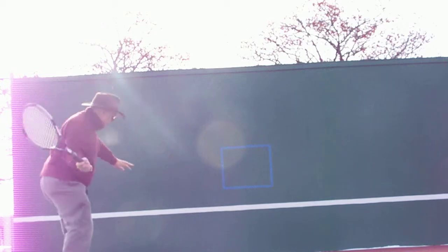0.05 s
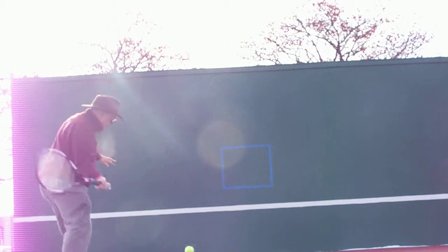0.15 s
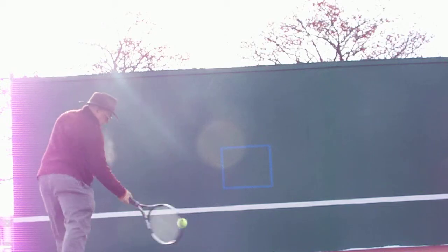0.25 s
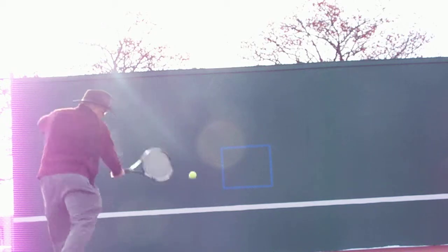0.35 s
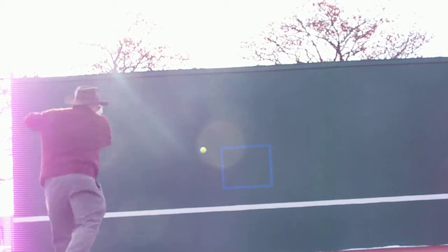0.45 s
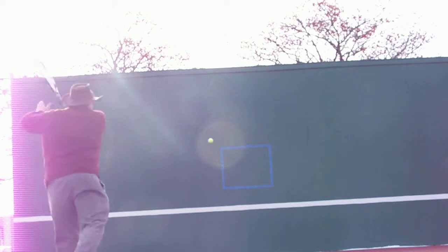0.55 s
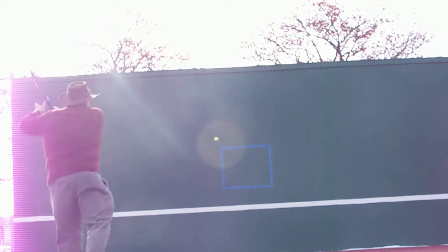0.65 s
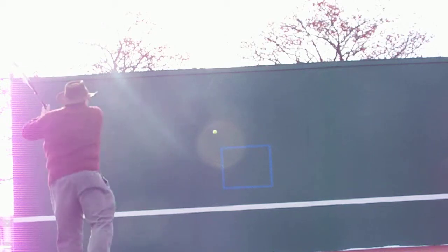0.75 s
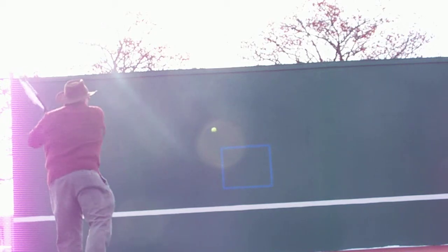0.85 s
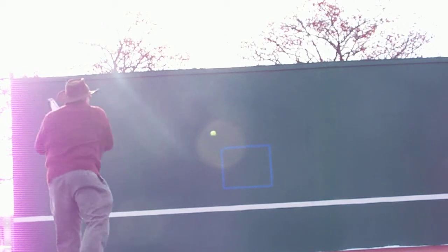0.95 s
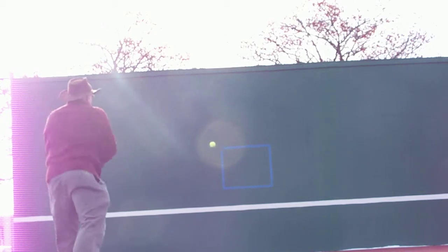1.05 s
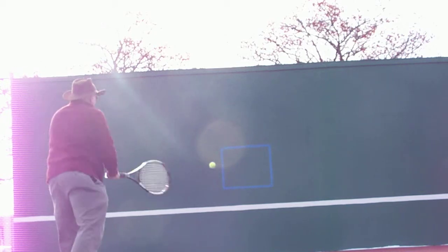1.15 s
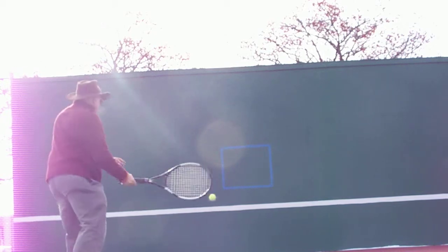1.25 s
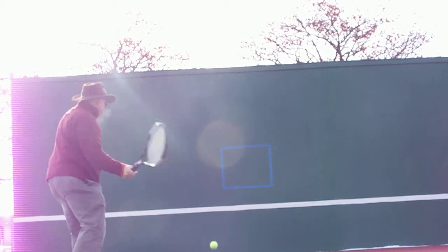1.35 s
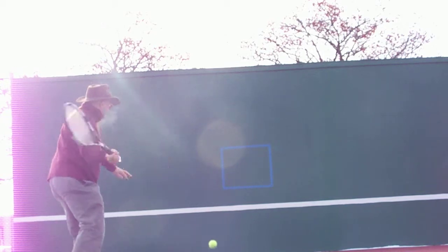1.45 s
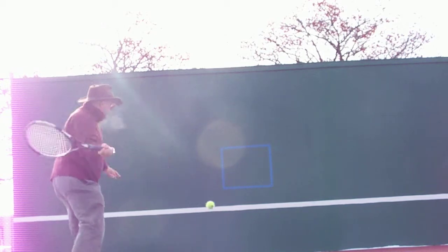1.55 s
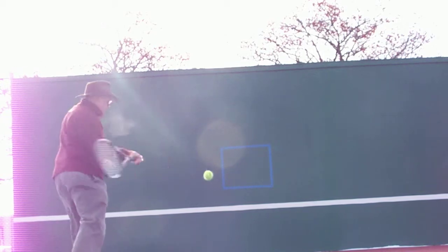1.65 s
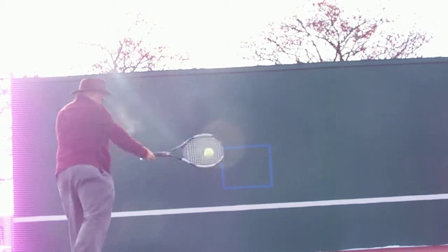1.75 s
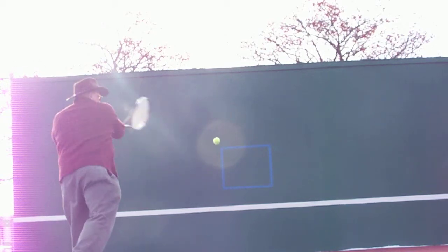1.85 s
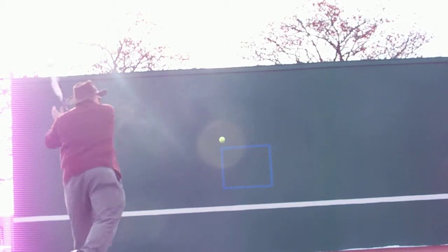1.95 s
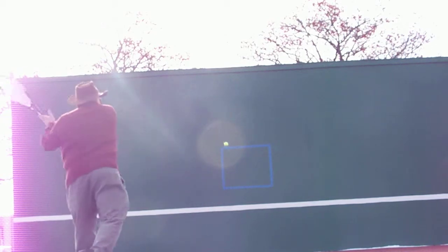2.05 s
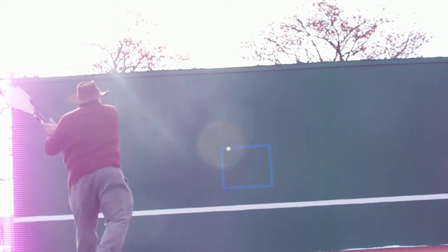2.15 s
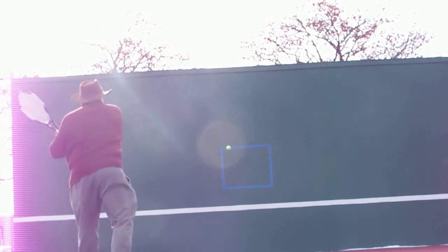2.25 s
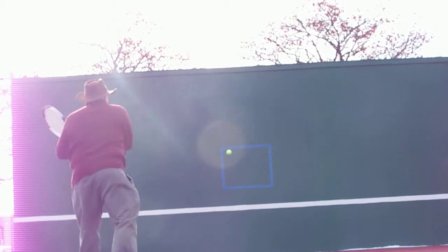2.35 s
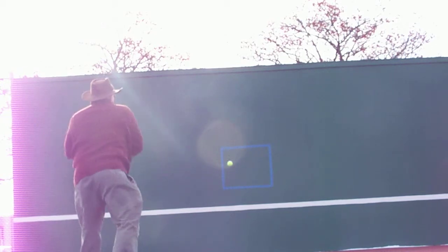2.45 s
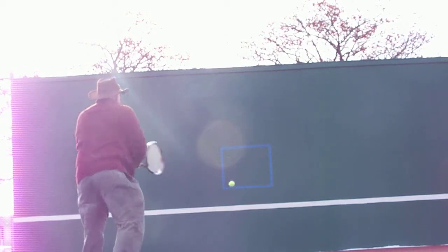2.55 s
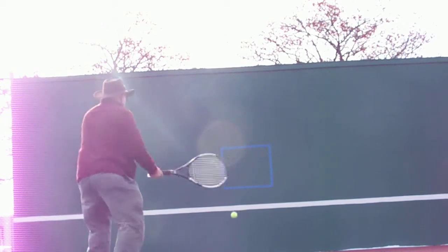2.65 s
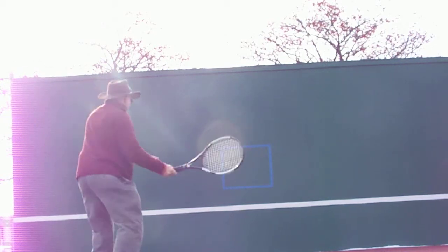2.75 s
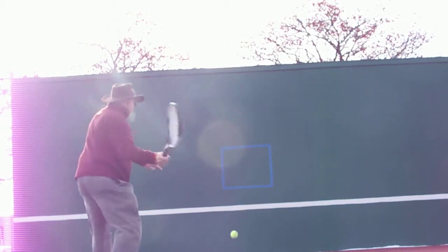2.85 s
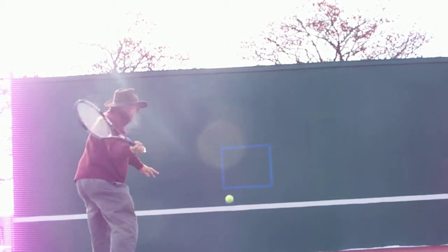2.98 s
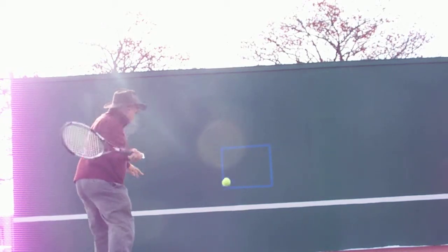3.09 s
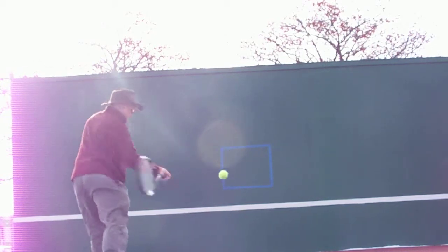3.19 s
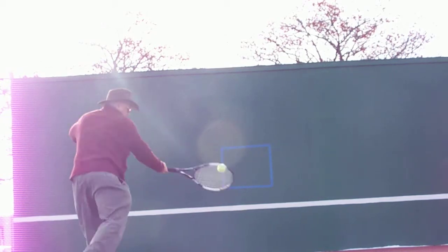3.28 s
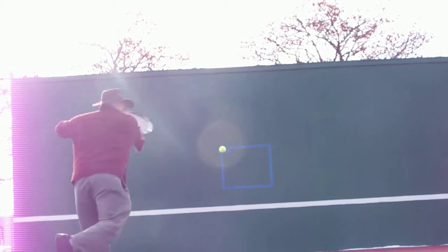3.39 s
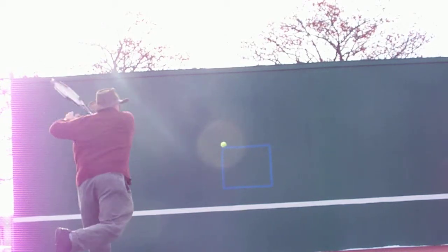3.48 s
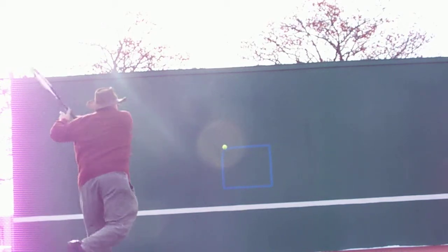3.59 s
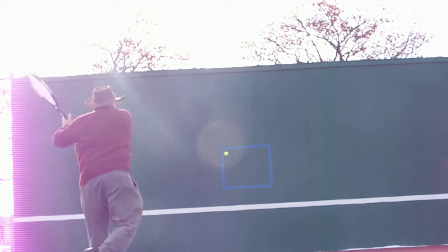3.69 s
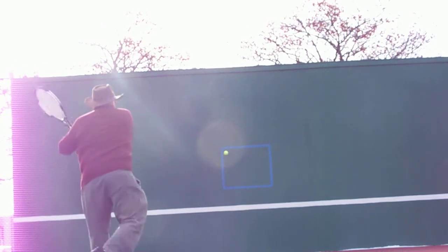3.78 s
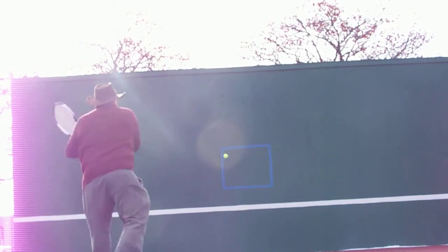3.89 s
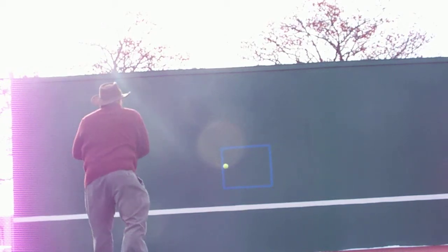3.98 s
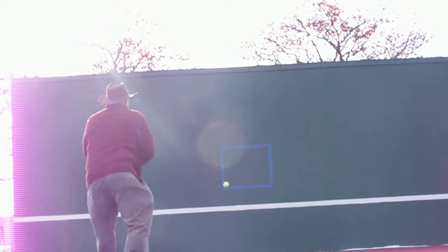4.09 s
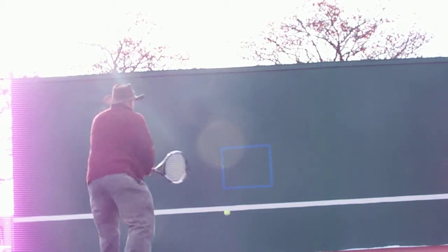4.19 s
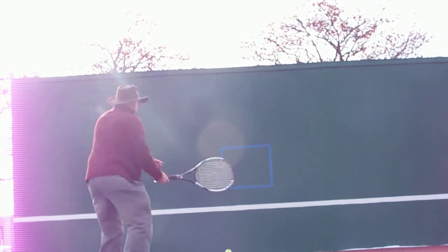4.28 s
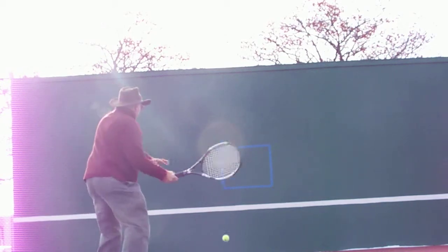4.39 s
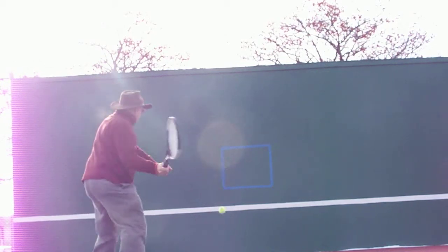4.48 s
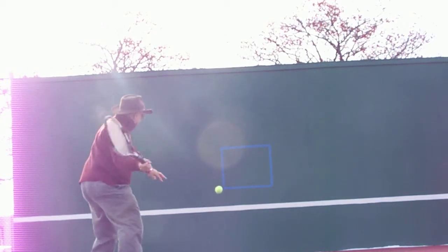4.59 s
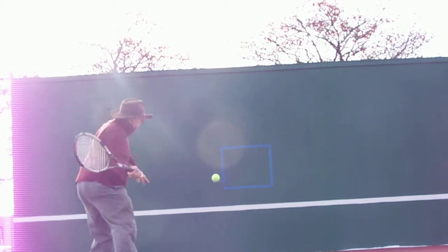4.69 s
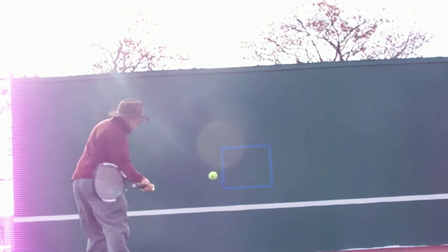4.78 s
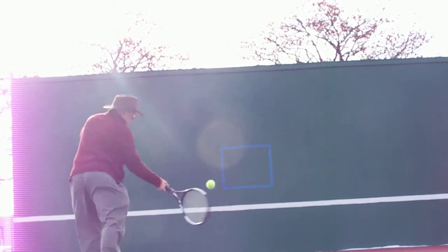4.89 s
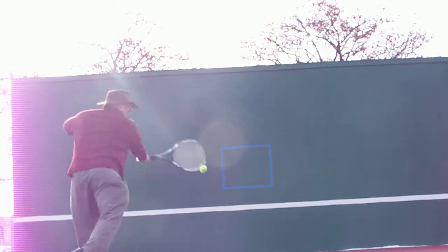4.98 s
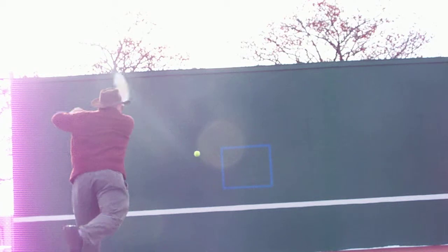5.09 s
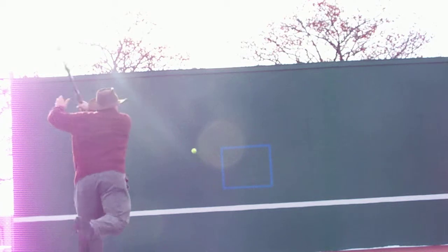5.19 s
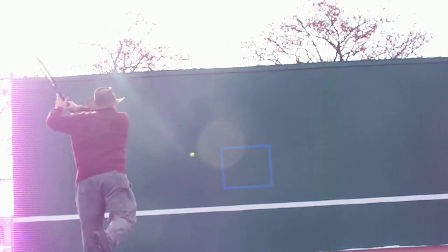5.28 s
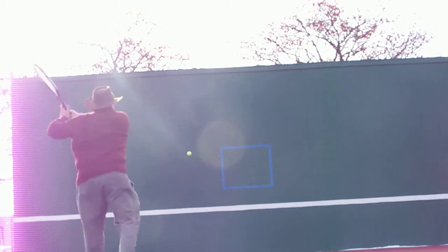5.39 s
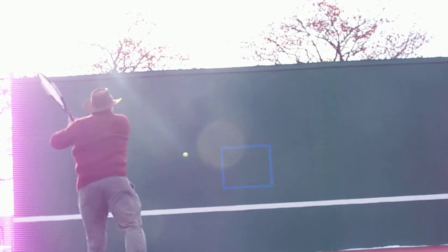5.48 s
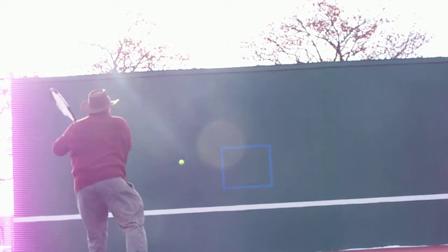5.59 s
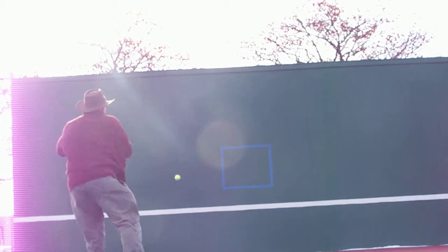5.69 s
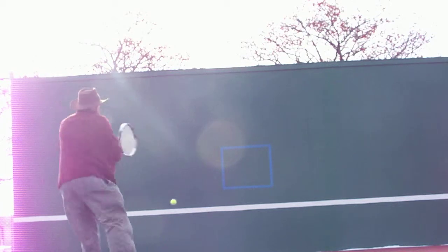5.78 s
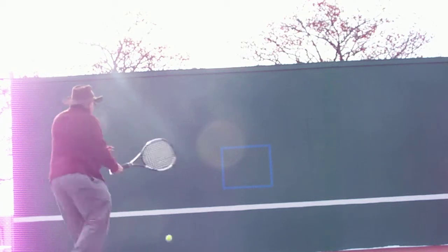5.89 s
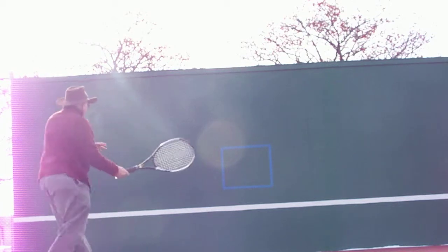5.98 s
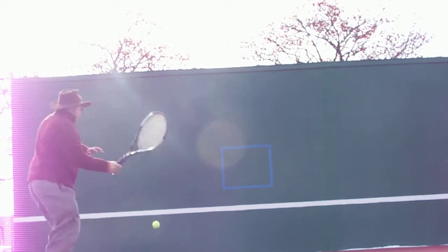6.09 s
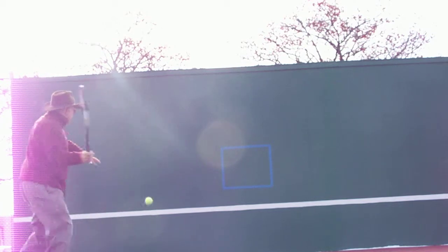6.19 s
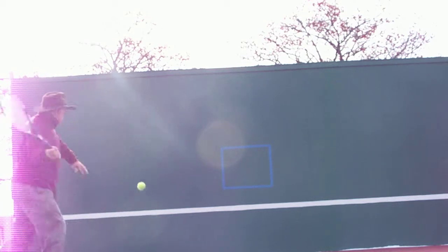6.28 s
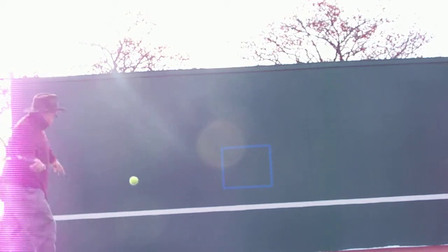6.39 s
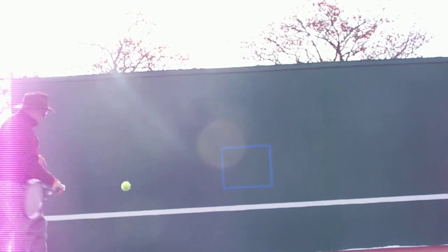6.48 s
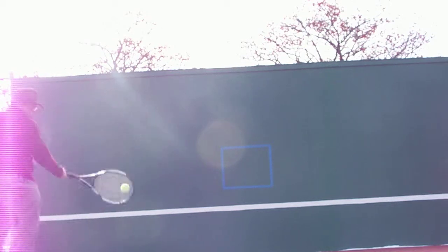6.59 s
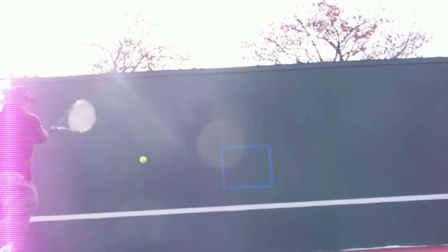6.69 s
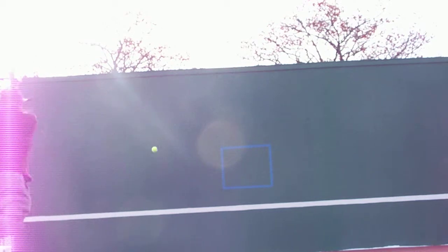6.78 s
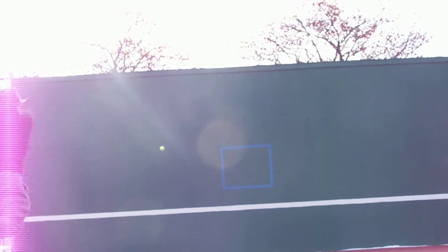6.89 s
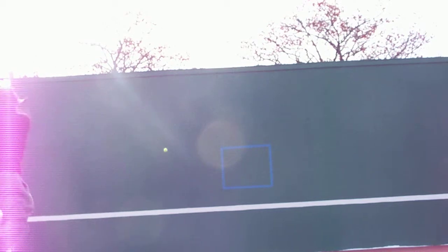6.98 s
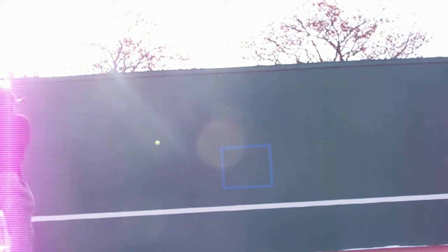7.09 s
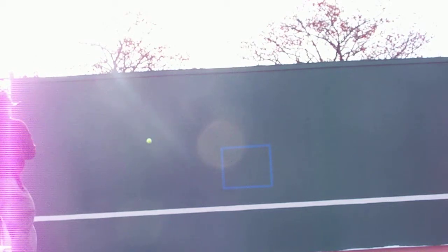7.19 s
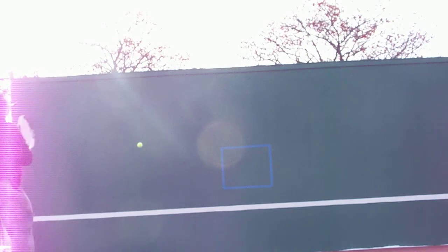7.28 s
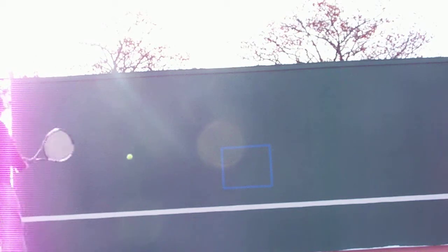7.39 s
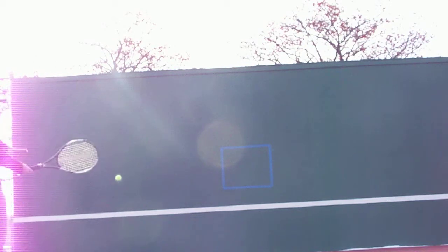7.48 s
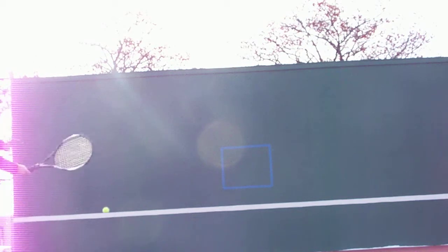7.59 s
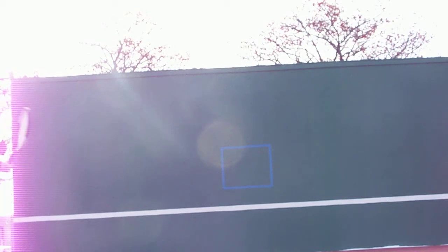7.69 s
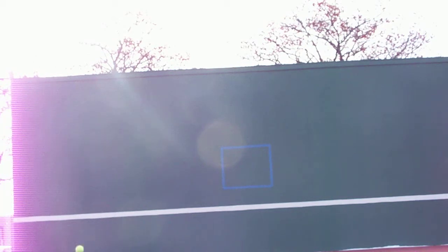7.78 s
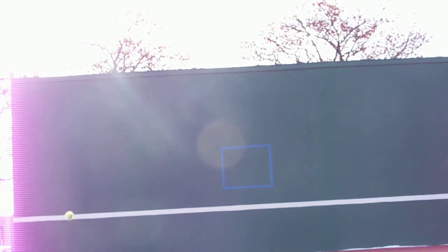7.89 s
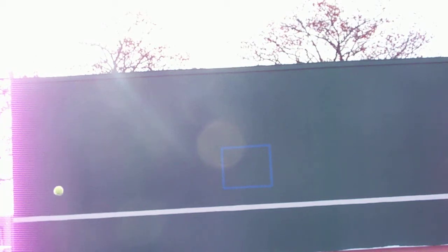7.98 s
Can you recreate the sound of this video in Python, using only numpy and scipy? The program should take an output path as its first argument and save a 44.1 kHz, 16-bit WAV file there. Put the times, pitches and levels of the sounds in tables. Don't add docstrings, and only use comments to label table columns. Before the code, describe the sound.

Outdoors on a hard court, over soft, wavering far-town rumble and faint hum, a ball is rallied against a hollow wall. A faint sole squeak opens, then a weak bounce at 0.15 s, a soft, springy racket pop at 0.35 and a loud wall slap with low panel boom at 0.75. The cycle repeats: bounces at 1.5, 2.8, 4.4 and 6.0 s, short thuds with a tick; racket hits at 1.8, 3.3, 5.0 and 6.6, snappy with a brief string ring; wall smacks at 2.2, 3.8, 5.4 and 7.05. Each racket hit and bounce returns from the wall almost at once, and far facades and fence add slapping echoes. Gritty shoe scuffs come between, clearer near 0.7, 2.3, 5.45 and 7.15, with dull heel knocks at 3.7 and 7.15. A final fuller bounce at 7.8 has no hit after it. The small microphone dulls the treble.

```python
import sys
import numpy as np
from scipy import signal
from scipy.fft import rfft, irfft, next_fast_len
from scipy.io import wavfile
from scipy.ndimage import uniform_filter1d

SR = 44100
rng = np.random.default_rng(int(sys.argv[2]) if len(sys.argv) > 2 else 0)


def output_pcm(signal):
    pcm = np.clip(np.atleast_2d(signal).T, -1, 1) * 32767
    wavfile.write(sys.argv[1], SR, np.round(pcm).astype(np.int16))


def how_loud(loudness_db):
    steps = np.asarray(loudness_db, float) / 20
    return 10 ** steps


N = 355005


def band(x, lo_hz, hi_hz, order=2):
    edges = [lo_hz, min(hi_hz, .45 * SR)]
    return signal.sosfilt(signal.butter(order, edges, "bandpass", fs=SR, output="sos"), x)


def hiss(size, lo_hz, hi_hz):
    x = band(rng.standard_normal(size), lo_hz, hi_hz)
    return x / x.std()


def fade(t, t60):
    return (t >= 0) * how_loud(-60 * np.maximum(t, 0) / t60)


def ring(t, hz, t60, turn=0.):
    return fade(t, t60) * np.sin(2 * np.pi * (hz * t + turn))


def bump(t, centre, width):
    return np.exp(-((t - centre) / width) ** 2)


def add(out, s, x):
    i = int(s * SR)
    out[i:i + len(x)] += x[:len(out) - i]


def walk(rate):
    k = int(SR / rate)
    steps = np.repeat(rng.standard_normal(N // k + 1), k)
    return 1.3 * uniform_filter1d(uniform_filter1d(steps, k), k)[:N]


# (frequency [Hz], level [dB per Hz])
TOWN = [(22, -57.5), (60, -60.5), (120, -64.5), (250, -73), (420, -75), (620, -84), (950, -84.5),
        (1500, -90), (2100, -95.5), (2700, -102), (4200, -110), (6300, -108), (7800, -110), (8400, -116)]
# (frequency [Hz], width [Hz], level [dB])
DRONES = [(1180, 110, -63), (1920, 130, -68), (7714, 30, -80), (8285, 40, -86)]
HUM_HZ, HUM_DB = 117, -54


def town():
    size = next_fast_len(N)
    f = np.maximum(np.arange(size // 2 + 1) * SR / size, 1)
    town_hz, town_db = np.transpose(TOWN)
    shape = how_loud(np.interp(np.log(f), np.log(town_hz), town_db)) * np.sqrt(SR / 2)
    spectrum = rfft(rng.standard_normal(size)) * shape * (f > 15)
    out, swell = 0, walk(.6)
    for octave in np.arange(4, 13.5, .5):
        part = np.cos(np.pi * np.clip(np.log2(f) - octave, -.5, .5)) ** 2
        out = out + how_loud(.7 * swell + 1.3 * walk(5)) * irfft(spectrum * part, size)[:N]
    for hz, width, db in DRONES:
        out = out + how_loud(db + walk(3)) * hiss(N, hz - width / 2, hz + width / 2)
    hum = np.sin(2 * np.pi * HUM_HZ * np.arange(N) / SR)
    return out + how_loud(HUM_DB + 4.7 * walk(5)) * hum


# (lag [ms], level [dB])
FACADES = [(160.1, -13), (258.0, -22), (418.1, -35.5), (516.0, -40.5)]
# (lag [ms], level [dB])
NEARBY = [(30.5, -22), (71, -33.5), (121, -28.5)]


def court(x, ahead):
    out, far = np.zeros(N), band(band(ahead, 250, 3700), 100, 4200)
    t = np.arange(SR // 30) / SR
    ledges = how_loud(-37) * hiss(len(t), 400, 3500) * fade(t - .001, .03)
    far = far + signal.fftconvolve(far, ledges)[:N]
    for lag_ms, db in FACADES:
        add(out, lag_ms / 1000, how_loud(db) * far)
    for lag_ms, db in NEARBY:
        add(out, lag_ms / 1000, how_loud(db) * band(x, 780, 3800, order=1))
    t = np.arange(SR) / SR
    specks = rng.standard_normal(SR) * (rng.random(SR) < 250 / SR)
    tail = how_loud(-62.5) * hiss(SR, 500, 3600) * fade(t - .006, 1.15)
    tail = tail + how_loud(-46) * specks * fade(t - .003, .25)
    return out + signal.fftconvolve(x, tail)[:N]


# (time [s], length [s], hiss level [dB], weight on the sole: scrape over hiss [dB])
SCUFFS = [(0.638, 0.059, -52, -10), (0.692, 0.043, -46.5, -3.5), (1.055, 0.032, -64, 1),
          (1.763, 0.051, -64, 0), (2.081, 0.012, -59, -1), (6.535, 0.012, -66, -3),
          (2.287, 0.037, -46, 4.5), (3.159, 0.086, -67, 12.5), (3.221, 0.083, -52, 0.5),
          (3.297, 0.055, -54, -16), (3.696, 0.0094, -59, -5.5), (3.985, 0.018, -54.5, 8.5),
          (4.854, 0.12, -52.5, 2.5), (5.456, 0.032, -37.5, 2.5), (5.51, 0.067, -65, 1),
          (5.849, .013, -52, -1), (5.865, 0.022, -62, -9), (5.929, 0.057, -56, -5), (6.049, 0.021, -53, 2),
          (7.138, 0.044, -44.5, 2.5), (7.571, 0.047, -59.5, -5), (7.652, 0.028, -72, 4),
          (7.691, 0.034, -61.5, -1), (7.73, 0.021, -57.5, 2)]
# (time [s], level [dB], pitch [Hz])
HEELS = [
    (3.706, -32, 300),
    (7.143, -31, 300),
]
# (time [s], length [s], pitch [Hz], level [dB])
SQUEAK = (.03, .11, 1140, -51)
EVEN_SCUFF_DB, FADE_PER_DB = -62, -0.5943


def shoes():
    out = np.zeros(N)
    t = np.arange(int(.16 * SR)) / SR
    for s, length, hiss_db, weight_db in SCUFFS:
        scrape_db, fade_db = hiss_db + weight_db, FADE_PER_DB * (hiss_db - EVEN_SCUFF_DB)
        start = np.clip(t / (0.0038 + 0.13 * length), 0, 1)
        stop = np.clip((length - t) / 0.01 + 1, 0, 1)
        edge = start * stop * how_loud(fade_db * t / length)
        grit = how_loud(2.6 * uniform_filter1d(rng.standard_normal(len(t)), size=60) * 6)
        bright = how_loud(hiss_db) * hiss(len(t), 5300, 7230)
        scrape = how_loud(scrape_db) * hiss(len(t), 1000, 3300)
        add(out, s, edge * grit * (bright + scrape))
    t = np.arange(SR // 10) / SR
    for s, db, hz in HEELS:
        add(out, s, how_loud(db) * hiss(len(t), .5 * hz, 2 * hz) * fade(t, 0.036))
    s, length, hz, db = SQUEAK
    t = np.arange(int(length * SR)) / SR
    add(out, s, how_loud(db) * np.sin(np.pi * t / length) ** 0.24 * np.sin(2 * np.pi * hz * t))
    return out


# (time [s], level [dB], thud [dB], tick [dB])
BOUNCES = [
    (0.1546, -30, -4, -28),
    (1.4661, -23.5, 1, -25),
    (2.8382, -22.5, -1.5, -21.5),
    (4.3860, -24.5, 1.1, -28),
    (6.0247, -22.5, 2, -21),
    (7.7884, -23.5, 3, -21),
]
BOUNCE_DETOURS_MS = [51.1, 45.6, 38.2, 34.2, 36.6, 43.3]
BOUNCE_ECHO_DB, ECHO_PER_THUD = -11, .1


def bounce():
    out, t = np.zeros(N), np.arange(SR // 20) / SR
    for (s, db, thud_db, tick_db), detour_ms in zip(BOUNCES, BOUNCE_DETOURS_MS):
        echo_db = BOUNCE_ECHO_DB + ECHO_PER_THUD * thud_db
        shell = -.8 * bump(t, 0.00054, .0009) * np.cos(2 * np.pi * 1320 * (t - .0003))
        shell = shell + 0.24 * ring(t, 1240, 0.014, 0.57) - 0.12 * bump(t, 0.00027, .0001)
        tick = hiss(len(t), 6200, 7300) * fade(t, 0.013)
        thud = ring(t, 235, 0.025, -0.47) * (1 - fade(t, 0.0014))
        add(out, s, how_loud(db) * (shell + how_loud(thud_db) * thud + how_loud(tick_db) * tick))
        echo = band(shell, 1500, 3500) + 0.52 * ring(t, 2200, 0.0024)
        add(out, s + detour_ms / 1000, how_loud(db + echo_db) * echo)
    return out


# (time [s], level [dB], sideways from panel middle [steps], upward [steps], spit of air [dB])
BLOWS = [
    (0.7497, 0.5, -1.4, 0.96, 2.5),
    (2.2256, 0, 0.05, 0.46, -17),
    (3.7912, -2.5, 0.16, 0.97, -20.5),
    (5.4051, -1.5, -0.29, -.75, -7.5),
    (7.0573, -2.5, -0.34, -0.66, 8),
]
# (frequency [Hz], t60 [s])
PANEL = [(66, 0.22), (108.3, 0.22), (172, 0.26), (227, 0.14), (146.2, 0.19)]
# (level [dB], change sideways [dB per step], upward [dB per step])
PANEL_DRIVE = [(-40, -6.5, 0.5), (-16, 15.5, -3), (-21, 2, -6.5), (-18.5, 3.5, 2.5), (-24.5, 0, -10)]


def wall():
    crack, ahead, boom = np.zeros(N), np.zeros(N), np.zeros(N)
    t = np.arange(SR // 2) / SR
    for (s, db, side, up, spit_db), chance in zip(BLOWS, rng.standard_normal((len(BLOWS), 4))):
        modes_db = np.array(PANEL_DRIVE) @ [1, side, up]
        slap = -bump(t, 0.00038, 0.00024) - 0.49 * bump(t, 0.00096, .00022) + 0.17 * bump(t, .005, 0.00098)
        cycles = 690 * t + 22000 * t ** 2
        ball = 0.22 * bump(t, 0.0015, 0.0043) * (t > .001) * -np.sin(2 * np.pi * (cycles - 690 * 0.0009))

        skin = 0.12 * bump(t, 0.00087, 0.0004) * np.sin(2 * np.pi * 3150 * t)
        skin = skin + 0.033 * ring(t, 1505, 0.0047, 0.23) + 0.018 * ring(t - .0036, 2400, 0.0036)
        skin = skin + 0.018 * hiss(len(t), 1400, 4100) * fade(t, .05)
        spit = how_loud(spit_db) * .08 * bump(t, 0.00025, .0005) * np.sin(2 * np.pi * 7600 * t)
        spit = spit + 0.081 * hiss(len(t), 4800, 6400) * (fade(t, 0.0062) + .04 * fade(t, 0.19))
        loose = rng.standard_normal(len(t)) * (rng.random(len(t)) < 900 / SR)
        ticks = 0.034 * band(loose, 1800, 8000, order=1) * fade(t - .006, 0.38)
        add(crack, s, how_loud(db) * (slap + ball + skin + spit + ticks))

        beam = -bump(t, 0.00032, .00013) + .5 * ring(t - .0003, 1500, 0.0018) + 0.33 * ball
        add(ahead, s, how_loud(db) * beam)

        panels = sum(how_loud(g) * ring(t, hz * (1 + 0.058 * a), t60, -0.11)
                     for g, (hz, t60), a in zip(modes_db, PANEL, [*chance, 0]))
        rattle = how_loud(-26.5) * hiss(len(t), 75.5, 232) * fade(t, 0.58)
        rattle = rattle + how_loud(-26) * hiss(len(t), 10, 61.5) * fade(t, 0.99)
        add(boom, s, (1 - fade(t, 0.0031)) * panels + rattle * (1 - fade(t, 0.047)))
    return crack, ahead, boom


def released(t, hz, rise, lasts):
    return bump(t, 0, np.where(t < 0, rise, lasts)) * -np.cos(2 * np.pi * hz * t)


# (time [s], contact [ms], force [dB], how squarely met [dB], spin that rips the felt [dB])
STROKES = [
    (.3430, 5.07, -3, 5, 2.5),
    (1.8026, 4.78, -2, 1.5, -3.5),
    (3.3277, 4.6, 2, -3.5, 1.5),
    (4.99, 5.1, 1.5, -2, 0),
    (6.6312, 4.7, -0.5, 2, 5.5),
]
DETOURS_MS = [54.6, 54.8, 52.8, 50.4, 52.1]
# (level [dB], per force [dB/dB], per squareness [dB/dB], per longer contact [dB/ms])
STROKE_PARTS = [(-5.5, -0.05, -0.08, -2.5), (-11.5, 1, 0, 3), (-36.5, 3, 2.54, 2.5), (-34, 0, 0.65, 6.5),
                (-34, 1.6, 0.7, 2), (-10.5, 1.17, 0, 2)]
# (frequency [Hz], level [dB], t60 [s])
STRINGS = [(1246, -3, 0.14), (853, -6, 0.16), (1660, -11.5, 0.1)]
USUAL_CONTACT_MS = 4.8
BED_HZ = 552


def racket():
    out, returned, t = np.zeros(N), np.zeros(N), np.arange(SR // 2) / SR
    chance = rng.standard_normal((len(STROKES), 6))
    for (s, ms, force_db, square_db, spin_db), detour_ms, luck in zip(STROKES, DETOURS_MS, chance):
        parts_db = np.array(STROKE_PARTS) @ [1, force_db, square_db, ms - USUAL_CONTACT_MS]
        push, ball, bed, upper, felt, front = how_loud(parts_db)
        c = ms / 1000
        squash = bump(t, .5 * c, 0.00045) - 0.32 * bump(t, 0.00054, 0.00016)
        squash = squash - .5 * bump(t, 0.0013, 0.00031) - 0.13 * bump(t, 0.97 * c, 0.00098)
        snap = -.7 * bump(t, c, 0.00018)
        rip = 1.12 * bump(t, 0.0014, 0.002) + 0.36 * fade(t, 0.048) + 0.042 * fade(t, 0.22)
        nap = hiss(len(t), 5150, 7200) * rip
        brush = hiss(len(t), 980, 3800) * (fade(t, 0.029) + 0.14 * fade(t, 0.24))
        swing = (t > c) * bump(t, c, .045) * np.sin(2 * np.pi * BED_HZ * (t - c))
        strings = sum(how_loud(db + 3.1 * a) * ring(t - c, hz * (1 + 0.0088 * b), t60)
                      for (hz, db, t60), a, b in zip(STRINGS, luck[:3], luck[3:]))
        near = push * squash + felt * (how_loud(spin_db) * nap + 0.88 * brush)
        shell = released(t - c, 886, 0.00048, 0.0033) + snap
        add(out, s, near + ball * shell + bed * swing + upper * strings)

        face = released(t - c, 1174, .0005, 0.0012) + 0.2 * ring(t - c, 1600, 0.017) + 0.27 * snap
        chase = (t > c) * bump(t, c, .05) * np.sin(2 * np.pi * 1.045 * BED_HZ * t)
        echo = how_loud(-12.5) * near + 0.21 * felt * brush + front * face + 0.38 * bed * chase
        add(returned, s + detour_ms / 1000, echo)
    return out, returned


def scene():
    crack, ahead, boom = wall()
    stroke, returned = racket()
    near = stroke + bounce()
    to_facades = how_loud(-8.5) * near + how_loud(-1.0) * returned + ahead
    echoes = court(near + returned + crack, to_facades)
    return (near + returned + crack + echoes + boom + shoes() + town())[None]


def roll_off(x):
    return signal.sosfilt(signal.butter(12, 9150, fs=SR, output="sos"), x)


def record(dry):
    notch_hz, top_hz, self_noise_db = 4200, 8280, -73.5
    x = np.clip(dry[0], -.66, .66)
    b, a = signal.iirpeak(notch_hz, 1.7, fs=SR)
    x = x - 0.71 * signal.lfilter(b, a, x) + how_loud(self_noise_db) * hiss(N, 4600, 8200)
    x = signal.sosfilt(signal.cheby1(11, .5, top_hz, fs=SR, output="sos"), x)
    return roll_off(x[None])


dry = scene()
out = record(dry)
output_pcm(out)
```